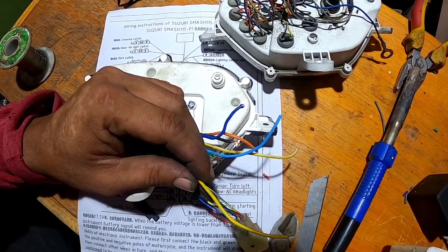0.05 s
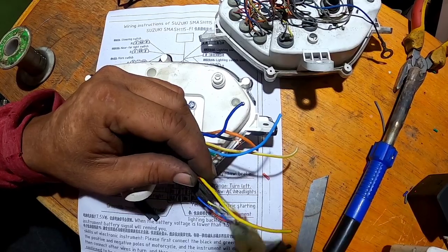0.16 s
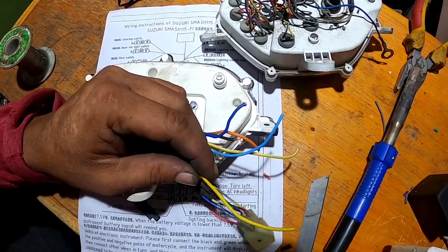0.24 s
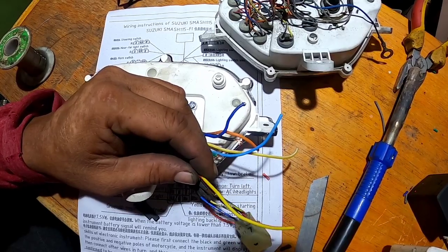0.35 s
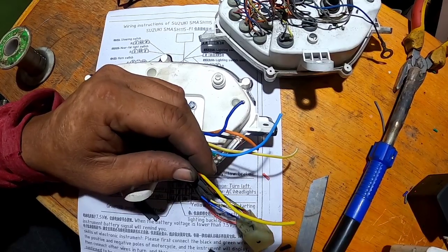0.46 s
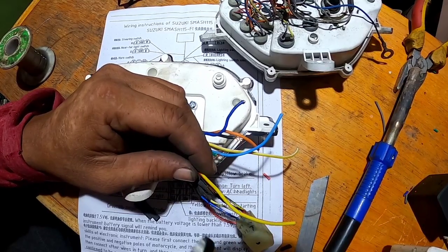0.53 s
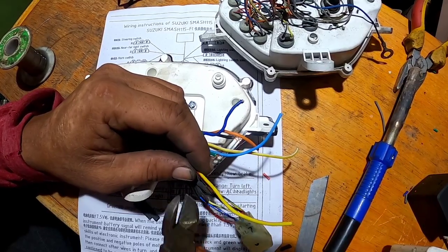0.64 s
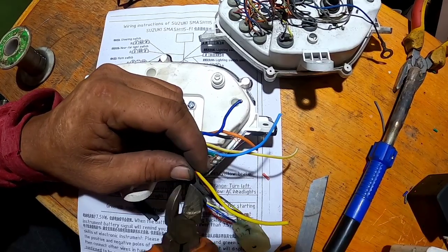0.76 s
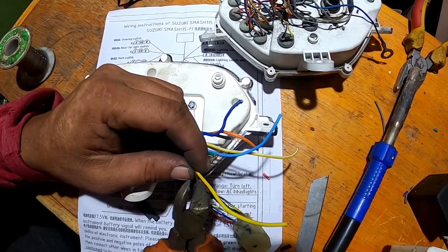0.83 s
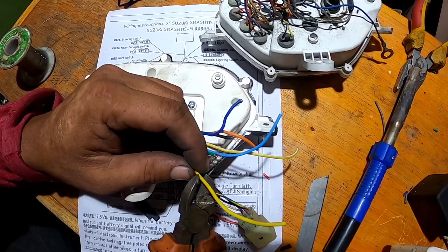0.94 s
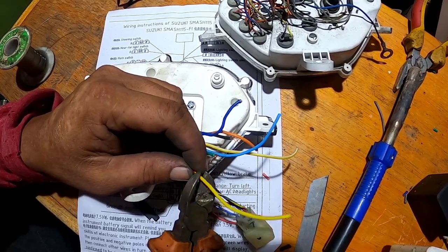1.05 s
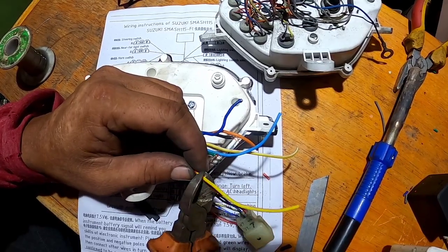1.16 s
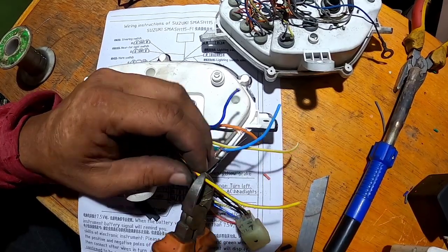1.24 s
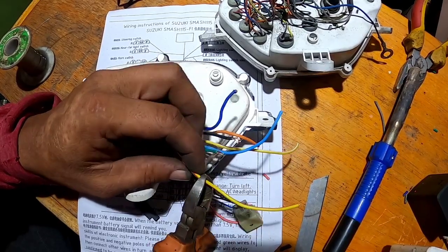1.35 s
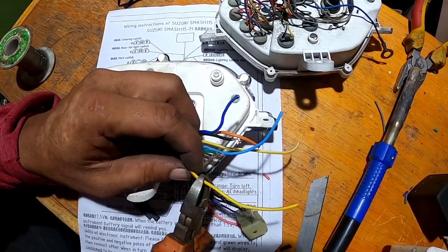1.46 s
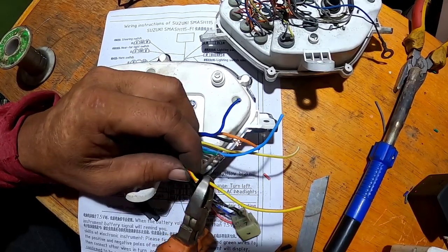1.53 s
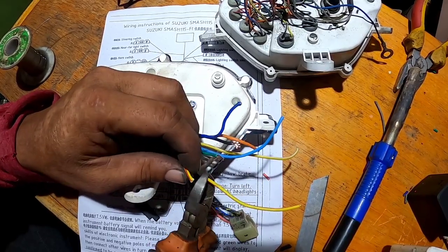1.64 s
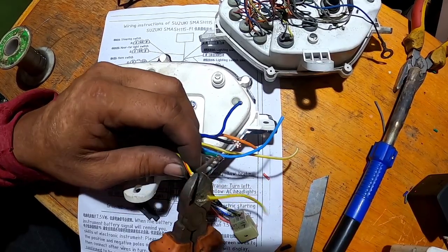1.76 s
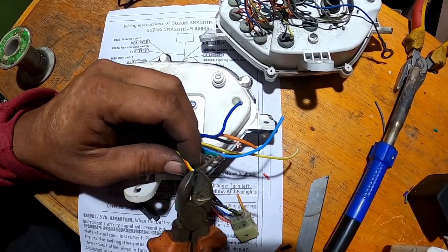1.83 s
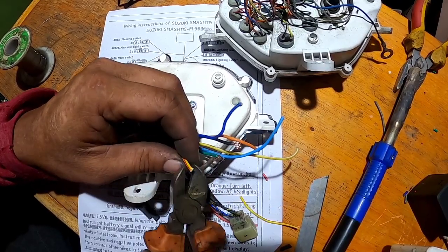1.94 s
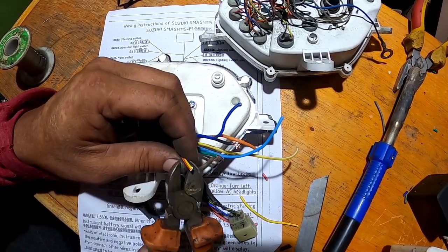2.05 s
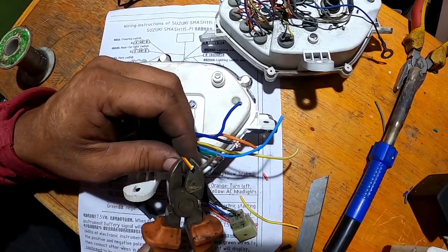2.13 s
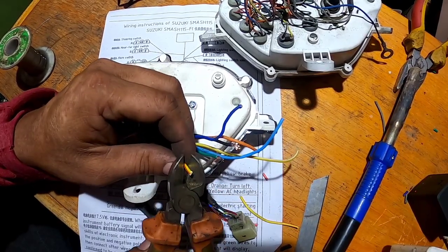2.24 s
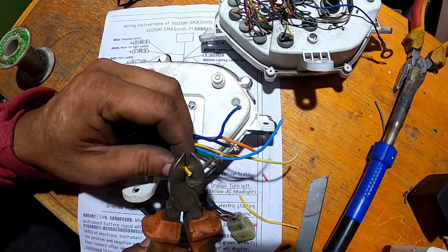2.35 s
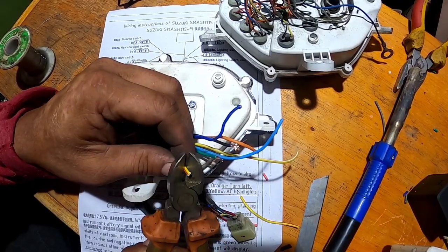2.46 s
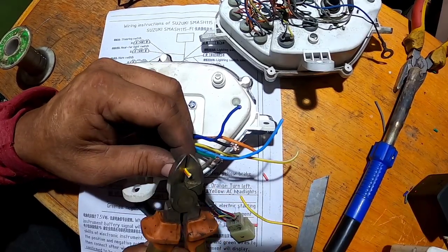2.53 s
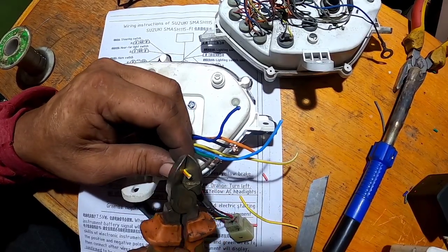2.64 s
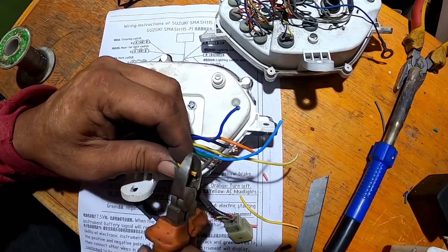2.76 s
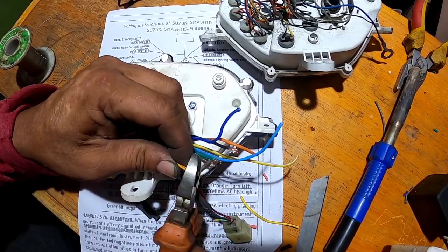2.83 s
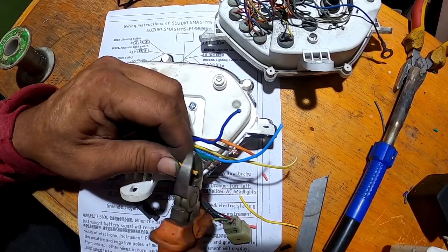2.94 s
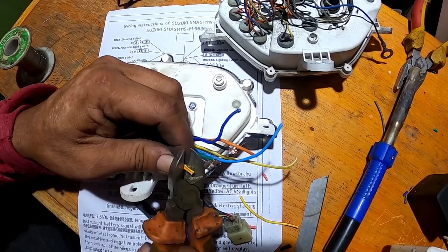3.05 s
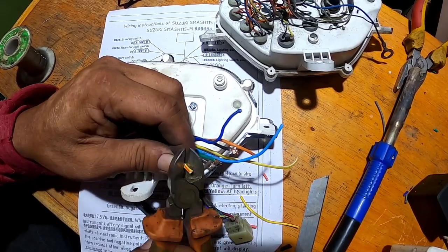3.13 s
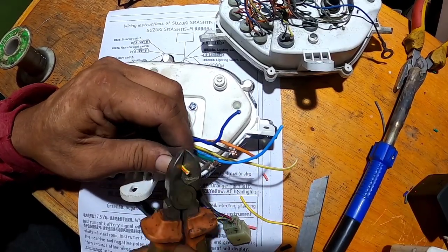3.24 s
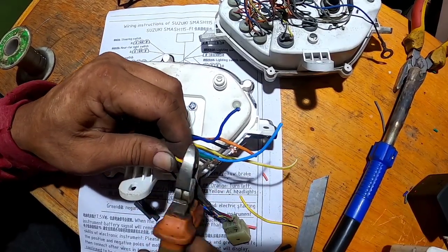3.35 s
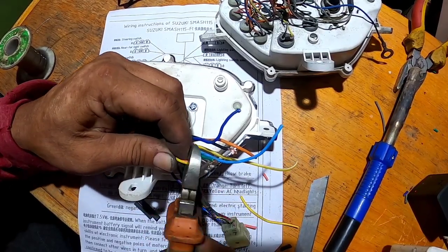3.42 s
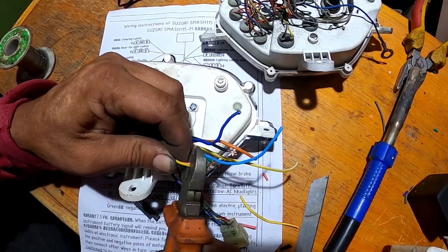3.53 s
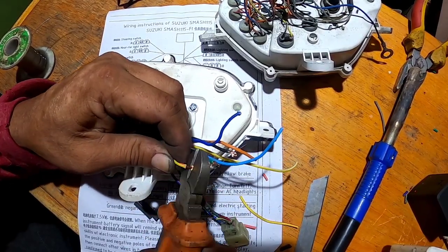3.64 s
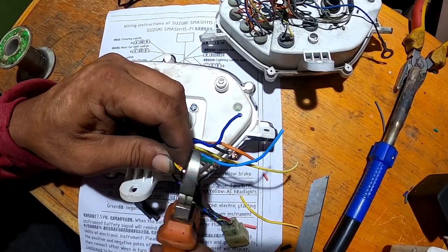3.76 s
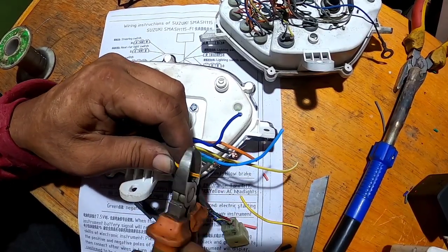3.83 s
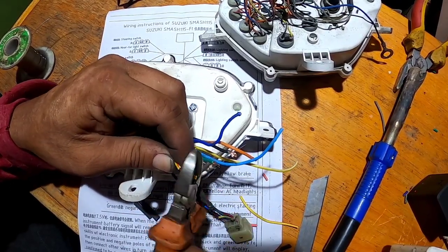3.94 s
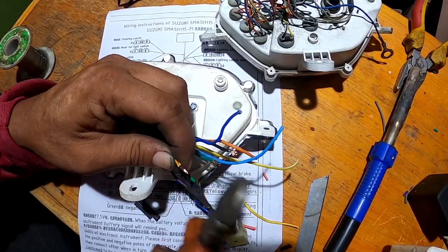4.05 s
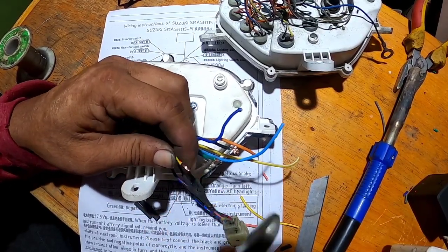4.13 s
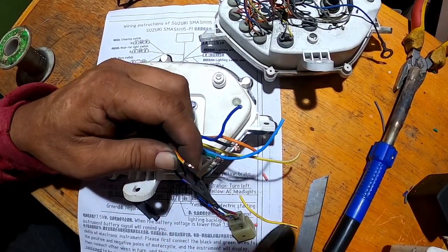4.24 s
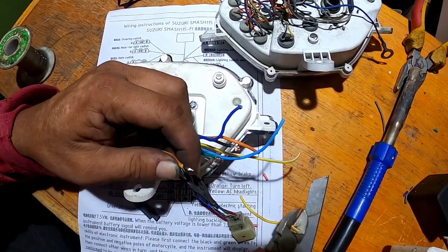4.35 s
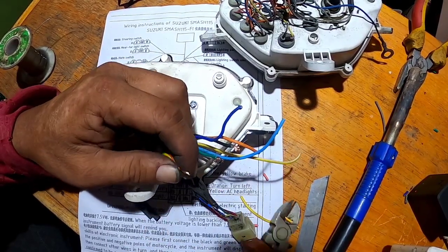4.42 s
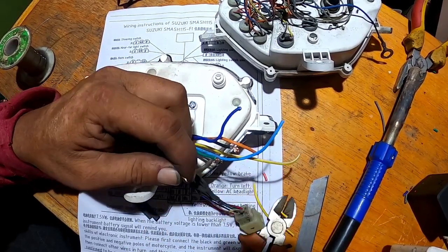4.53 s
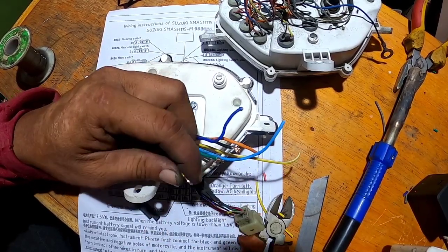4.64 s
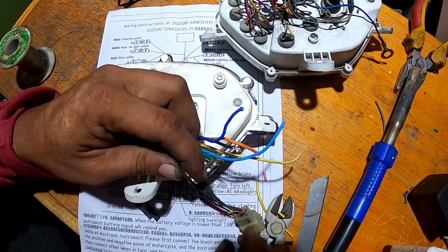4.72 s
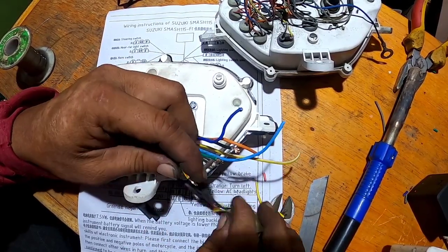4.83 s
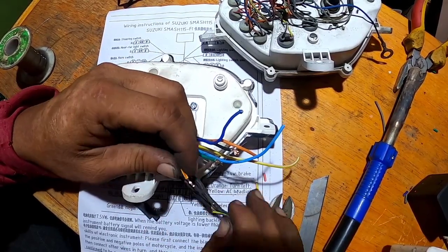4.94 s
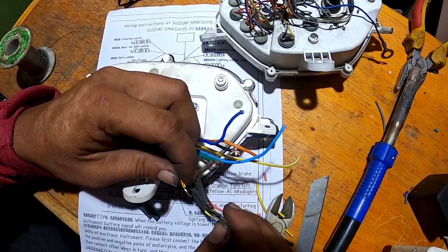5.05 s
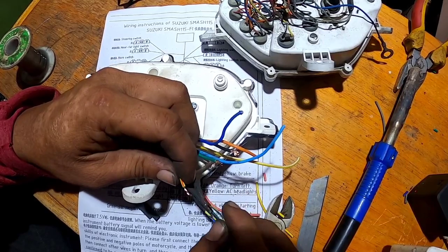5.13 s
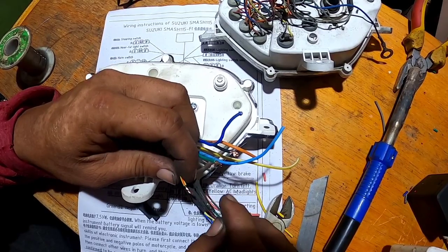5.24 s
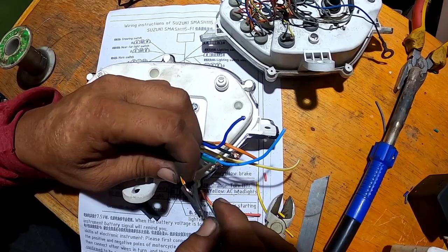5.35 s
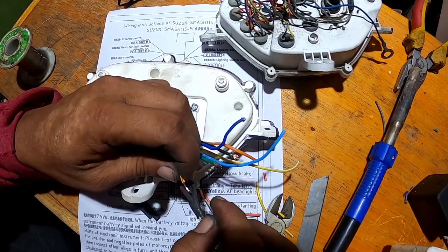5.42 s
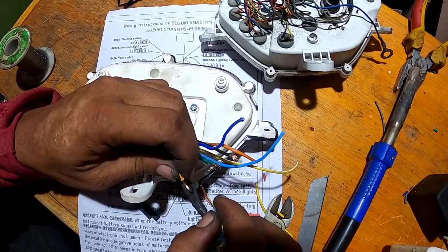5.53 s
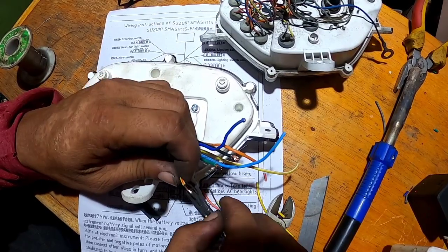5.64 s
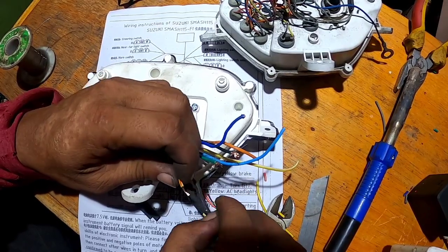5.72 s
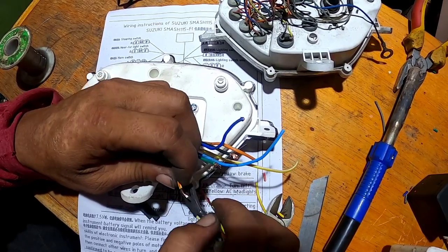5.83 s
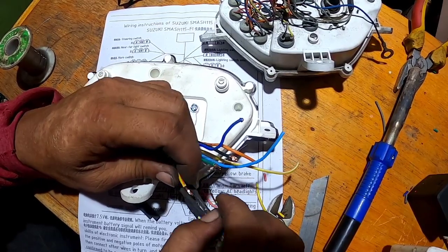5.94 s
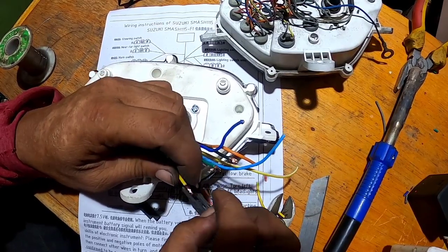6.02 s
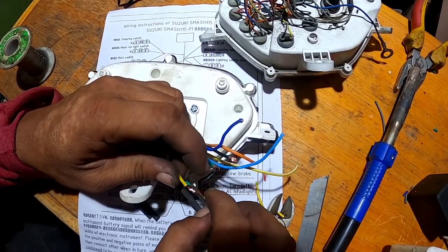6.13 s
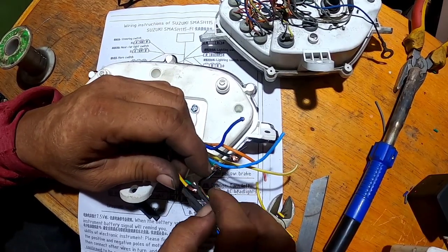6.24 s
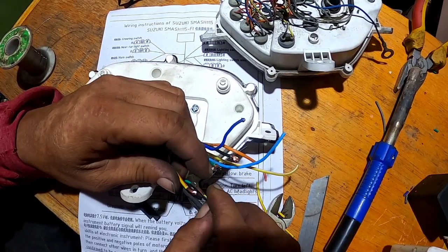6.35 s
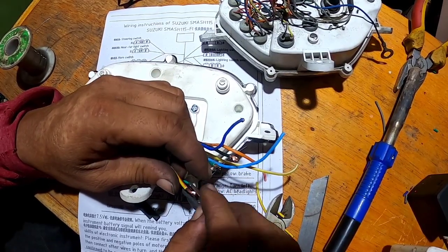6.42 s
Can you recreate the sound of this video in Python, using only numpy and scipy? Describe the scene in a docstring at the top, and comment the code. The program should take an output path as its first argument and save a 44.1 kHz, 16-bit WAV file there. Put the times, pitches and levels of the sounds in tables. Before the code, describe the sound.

Throughout, a low muffled street roar lies behind an idling engine's unsteady hum and a deep throb that comes and goes, strongest around 1.5 s. Close to the small stereo microphone, hands handle thin wires: soft bench bumps and slides at 0.2-0.3 s, dry bright clicks at 0.4 and 0.6, a dull knock at 1.6. Pliers snap sharply at 2.08 s, then more thinly at 2.19, amid tiny ticks. Sparse clicks follow at 2.75 and from 3.6, with light fiddling and a soft thump around 4.1-4.5. At 4.7-4.93 s the pliers drop and bounce, a very loud cluster of cracks, casing rattle and woody boom; the background ducks, then creeps back. A small scrape comes at 5.15, faint ticks at 5.7-6.1. A wall clock rasps faintly late in each second. From 5.2 s a very faint high pulsing trill appears, pauses about 5.4-5.85, and resumes to the end.

```python
"""Street roar, an idling engine and a deep throb come from outside: shaped noise, firing harmonics, a wavering sine.
Close by, hands strip and cut thin wires with pliers over a plastic casing on a wooden bench: noise ticks and scrapes.
The pliers snap twice, then are dropped and bounce: noise cracks that ring damped modes of casing and board.
A wall clock steps once a second in rough ringing contacts; late, a faint trill of short high pulses sets in.
A small stereo camera hears it close up; its gain ducks on peaks, as at the drop, and creeps back."""
import sys
import numpy as np
from scipy import signal
from scipy.fft import rfft, irfft, next_fast_len
from scipy.io import wavfile
from scipy.ndimage import uniform_filter1d, minimum_filter1d, map_coordinates

SR = 44100
rng = np.random.default_rng(int(sys.argv[2]) if len(sys.argv) > 2 else 0)


def voltage_ratio(level):
    """Linear amplitude factor for a level in decibels (scalar or array-like)."""
    return 10 ** (np.asarray(level, float) / 20)


def materialize(psi):
    """Save the field psi as 16-bit PCM at rate SR to the path in sys.argv[1].

    A 1-D psi becomes a single channel; in a 2-D psi each row is a channel.
    """
    bounded = np.clip(np.atleast_2d(psi).T, -1, 1)
    quanta = np.round(bounded * 32767).astype(np.int16)
    wavfile.write(sys.argv[1], SR, quanta)


N = 285768
TIME = np.arange(N) / SR


def unit(x):
    """Scaled to rms 1."""
    return x / np.sqrt(np.mean(x ** 2) + 1e-20)


def along(points, hz):
    """Interpolates (Hz, value) points on a log axis."""
    f, v = np.transpose(points)
    return np.interp(np.log(hz + 1), np.log(f + 1), v)


def curves(rows):
    """One value per sample for each column after the time."""
    s, *cols = np.transpose(rows)
    return [np.interp(TIME, s, c) for c in cols]


def wobble(knots_per_s):
    """A smooth random curve."""
    knots = rng.standard_normal(int(N * knots_per_s / SR) + 4)
    return map_coordinates(knots, [TIME * knots_per_s])


def filtered(x, response):
    """x through a complex response of frequency."""
    m = next_fast_len(2 * x.shape[-1])
    return irfft(rfft(x, m) * response(np.fft.rfftfreq(m, 1 / SR)), m)[..., :x.shape[-1]]


def band(x, centre_hz, octaves):
    """Noise kept around a centre, bell-shaped on a log axis, rms 1."""
    def bell(hz):
        return np.exp(-.5 * (np.log2((hz + 1) / centre_hz) / octaves) ** 2)
    return unit(filtered(x, bell))


def pair(mid, side, width):
    """Left and right from a shared part and a part that differs."""
    return np.array([mid + width * side, mid - width * side])


def add(track, start_s, sound):
    """Mixes a sound into the track in place."""
    part = track[..., round(start_s * SR):][..., :sound.shape[-1]]
    part += sound[..., :part.shape[-1]]


def click(centre_hz, octaves, t60_s, tail_db, tail_t60_s):
    """A burst of coloured noise, gone at once but for a fainter rattle."""
    t = TIME[:SR // 12]
    decay = voltage_ratio(-60 * t / t60_s) + voltage_ratio(tail_db - 60 * t / tail_t60_s)
    fade = decay * (1 - np.exp(-t / 0.00023))
    mid, side = band(rng.standard_normal((2, len(t))), centre_hz, octaves) * fade
    return pair(mid, side, width=0.24)


def ring(modes, weights, attack_s):
    """Damped modes set off together."""
    t = TIME[:SR // 3]
    tones = [w * voltage_ratio(db - 60 * t / t60_s) * np.sin(2 * np.pi * hz * t)
             for w, (hz, db, t60_s) in zip(weights, modes)]
    return sum(tones) * (1 - np.exp(-t / attack_s))


def chatter(sound, t60_s):
    """A rough contact is many tiny pushes in a row, not one."""
    t = TIME[:SR // 25]
    pushes = rng.standard_normal(len(t)) * voltage_ratio(-60 * t / t60_s)
    return signal.fftconvolve(sound, pushes / np.linalg.norm(pushes))


# Spectrum of the traffic. Each row: frequency in Hz, level in dB.
ROAR = [(15, -39), (25, -23.5), (56, -5.5), (85, -6.5), (141, -8.5), (303, -10.5), (391, -20), (840, -28),
        (1000, -23), (1590, -24), (2800, -32), (3300, -39.5), (7200, -42), (7900, -47), (11000, -45.5),
        (14300, -99)]
# Left-right likeness of the traffic. Each row: frequency in Hz, likeness from 0 to 1.
ALIKE = [(60, 0.34), (170, 0.97), (480, 0.83), (1360, 0.73), (3870, 0.64), (11000, 0.04)]
# Stereo lean of the traffic. Each row: frequency in Hz, left over right in dB.
LEAN = [(60, 1), (170, 2.5), (480, -0.5), (1360, 3), (3870, 4.5), (11000, -1.5)]


def roar():
    """Far traffic: shaped noise with slow patches in time and frequency, wider where the ports differ; rms 1."""
    z = signal.stft(rng.standard_normal((2, N)), nperseg=512)[2]
    field = uniform_filter1d(rng.standard_normal(z.shape[1:]), size=6, axis=0)
    field = uniform_filter1d(field, size=14, axis=1)
    patchy = signal.istft(z * voltage_ratio(1.25 * unit(field)), nperseg=512)[1][:, :N]

    def mid_side(hz):
        turn = np.arccos(np.clip(along(ALIKE, hz), 0, 1)) / 2
        return voltage_ratio(along(ROAR, hz)) * [np.cos(turn), np.sin(turn)]
    mid, side = filtered(patchy, mid_side)
    stereo = pair(mid, side, width=1.0)
    return unit(filtered(stereo, lambda hz: voltage_ratio(np.outer([.5, -.5], along(LEAN, hz)))))


# Engine harmonics. Each row: multiple of the firing rate, level in dB, share of the boom's swell.
ORDERS = [(1, -12, 0.82), (2, -6.5, 0.24), (3, -26, 1), (4, -9, 0.9), (5, -1, 0.11), (7, -16.5, 0.12),
          (9, -12, 0.72), (10, -16, 0.92), (13, -36, 0.61)]


def engine(firing_hz, engine_db, boom_db):
    """Harmonics of an unsteady firing rate, each wavering and swelling by its share of the boom."""
    phase = 2 * np.pi * np.cumsum(firing_hz * (1 + 0.0048 * wobble(5.5))) / SR
    out = np.zeros(N)
    for k, db, share in ORDERS:
        level_db = engine_db + db + share * boom_db + 1.1 * wobble(4.5)
        out += np.sqrt(2) * voltage_ratio(level_db) * np.sin(k * phase + rng.uniform(0, 2 * np.pi))
    return out


# Course of the throb. Each row: time in seconds, level in dB.
THROB = [(0, -43.5), (.25, -43), (.7, -50), (.82, -68), (.94, -53), (1.05, -69), (1.15, -41), (1.3, -49.5),
         (1.39, -37.5), (1.57, -32), (1.8, -53), (1.91, -43.5), (2.72, -49.5), (2.8, -64), (2.91, -44),
         (3.1, -70), (3.26, -42), (3.42, -64), (3.68, -41.5), (3.88, -60), (4.2, -45), (4.6, -53),
         (5.4, -54), (6.1, -56), (6.25, -43), (6.48, -56)]


def throb():
    """A deep wavering sine that comes and goes, 2.4 dB stronger on the left."""
    level_db, = curves(THROB)
    hz = 45.3 + 0.815 * wobble(4.02)
    tone = np.sqrt(2) * voltage_ratio(level_db) * np.sin(2 * np.pi * np.cumsum(hz) / SR)
    return tone * voltage_ratio([[1.2], [-1.2]])


# Course of the street. Each row: time in seconds, firing rate in Hz, engine level in dB,
# traffic level in dB, swell of the engine's boom in dB.
STREET = [(0, 29, -49.5, -49, 8), (.6, 28.98, -58.5, -50.5, 15.5), (1.5, 28.84, -52.5, -50, 5.5),
          (2.3, 29.14, -60, -50.5, 16), (3.2, 29.16, -50.5, -51, 2.5), (4.4, 29.2, -50, -50, -0.5),
          (5, 29.25, -47, -44.5, 8), (5.5, 29.17, -53.5, -47.5, 12.5), (5.9, 29.2, -44, -45, 7),
          (6.2, 28.9, -52, -46.5, 18.5), (6.48, 29.44, -59.5, -45, 27)]


def street():
    """Traffic roar, engine and throb outside, each following its own level curve."""
    firing_hz, engine_db, roar_db, boom_db = curves(STREET)
    return voltage_ratio(roar_db) * roar() + engine(firing_hz, engine_db, boom_db) + throb()


# The clearest wire and jaw ticks. Each row: start in seconds, level in dB, centre in Hz.
TICKS = [(0.0261, -35, 4360), (0.032, -42, 4110), (0.0608, -44, 4390), (0.1743, -46, 5340),
         (0.41, -33, 4080), (0.563, -43.5, 5200), (1.6241, -36.5, 7940), (1.6513, -43, 5100),
         (2.049, -44, 4010), (2.104, -35, 4230), (2.117, -33, 6490), (2.1435, -33, 6600),
         (2.2082, -27.5, 5650), (2.232, -45, 4960), (2.3086, -44.5, 5200), (2.358, -52, 5540),
         (2.376, -44, 6300), (2.4608, -42.5, 6100), (2.468, -42, 5210), (2.7506, -30.5, 5170),
         (3.024, -46, 6030), (3.596, -42.5, 4450), (3.907, -39.5, 5590), (4.0066, -39, 4540),
         (4.114, -50, 5770), (4.126, -44, 5950), (4.1904, -46, 4026), (4.3714, -37, 5200),
         (4.502, -42, 3860), (4.724, -29.5, 4100), (5.689, -42, 5890), (5.7199, -44, 6570),
         (5.7284, -40, 4700), (6.05, -45, 3800), (6.091, -47, 3500)]
# Spells of fiddling full of faint ticks. Each row: start in seconds, end in seconds, number of ticks.
FIDDLING = [(1.57, 1.8, 4), (2.1, 2.45, 3), (4.05, 4.5, 7)]


def ticks():
    """Wire ends and jaws touch: dry, very short clicks, the faint ones scattered through the busy spells."""
    out = np.zeros((2, N))
    faint = []
    for start_s, end_s, count in FIDDLING:
        for _ in range(count):
            s = start_s + (end_s - start_s) * rng.random()
            faint.append((s, -51 + 2 * rng.normal(), 5300 * 2 ** (0.21 * rng.normal())))
    for s, db, hz in TICKS + faint:
        pan_db = 2.5 * rng.normal() * np.array([[.5], [-.5]])
        sound = click(hz, 0.77, t60_s=0.0065, tail_db=-13.5, tail_t60_s=0.021)
        add(out, s, voltage_ratio(db - 2.5 + pan_db) * sound)
    return out


# Fingers, wire and steel sliding, plus one short tick at 0.369 s. Each row: start in seconds, length in
# seconds, level in dB, # centre in Hz, width in octaves.
SCRAPES = [(0.18, .03, -64, 4000, 1.65), (0.216, .1, -54, 3940, 0.8), (0.241, 0.081, -52, 1070, 0.85),
           (0.29, 0.026, -60.5, 9700, 0.19), (0.369, 0.013, -62, 2850, 0.24),
           (0.412, 0.024, -60, 4060, 0.4), (0.581, 0.06, -62, 4160, 0.78), (1.631, 0.038, -57.5, 5970, 1.1),
           (1.684, 0.15, -66, 4800, 0.9), (1.963, 0.092, -59.5, 3700, .7), (2.09, 0.2, -56, 5040, 1.6),
           (2.748, 0.094, -73, 6170, 2.5), (4.151, 0.039, -65, 7050, 0.9), (4.259, 0.037, -60, 7000, 0.68),
           (4.315, 0.076, -66, 6000, .7), (4.365, 0.033, -54, 6020, 4.9), (4.417, 0.09, -62, 6300, 0.73),
           (4.653, 0.018, -61, 6500, 0.38), (4.716, 0.13, -42.5, 3040, 1.2), (4.837, 0.13, -42, 3410, 0.88),
           (5.13, .05, -55, 4400, .12), (5.168, .045, -51, 4500, .12), (5.122, 0.1, -57, 4950, 0.91),
           (5.13, 0.047, -59.5, 9000, 0.091)]


def scrapes():
    """Sliding contact: grainy noise swelling and fading under each stroke."""
    out = np.zeros((2, N))
    for s, length_s, db, hz, octaves in SCRAPES:
        n = round(length_s * SR)
        grain = uniform_filter1d(rng.standard_normal(n), size=40) * np.sqrt(40)
        grit = rng.standard_normal((2, n)) * voltage_ratio(4.7 * grain)
        stroke = np.sin(np.pi * (np.arange(n) / n) ** 0.46) ** 0.53
        mid, side = band(grit, hz, octaves) * stroke * voltage_ratio(db + 0.5)
        add(out, s, pair(mid, side, width=0.14))
    return out


# Blows that shake the bench. Each row: start in seconds, crack level in dB, bench level in dB,
# crack centre in Hz, favoured board pitch in Hz.
BLOWS = [(0.183, -34, -55, 1560, 300), (.219, -37, -30, 2500, 316), (0.25, -60, -36.5, 3500, 202),
         (0.2661, -44, -34, 3700, 300), (1.636, -43, -29, 1000, 272), (1.9727, -56, -44, 1510, 255),
         (2.0765, -11.5, -29, 1440, 285), (2.189, -19.5, -45, 3230, 335), (2.2324, -38, -45, 1190, 324),
         (4.283, -70, -38.5, 1500, 72), (4.712, -26.5, -46, 3750, 300), (4.7212, -25, -22.5, 1130, 213),
         (4.7569, -9.5, 0.5, 1880, 266), (4.7745, -30, 2.5, 1830, 240), (4.8298, -13, 1, 3300, 282),
         (4.8516, -2.5, 0, 4070, 140), (4.8695, -38, -5.5, 2470, 300), (4.8983, -10.5, -2, 3480, 329),
         (4.913, -21, -12, 3120, 353), (4.93, -39, -20.5, 2480, 385), (5.162, -30, -35, 1490, 300)]
# Modes of the board. Each row: frequency in Hz, level in dB, t60 in seconds.
BENCH = [(72, 16, 0.047), (133, 4, 0.052), (161, -0.5, 0.11), (182.5, 0, 0.16), (250.7, 2.5, 0.17),
         (272, 2, 0.12), (300, 5, 0.119), (346, -16, 0.2), (385, 4, 0.14), (447, 3.5, .07),
         (550, -3, 0.097)]
# Modes of the casing and the pliers lying on it. Each row: frequency in Hz, level in dB, t60 in seconds.
CASING = [(530, -21.5, 0.37), (646, 4, 0.077), (700, -1.5, 0.069), (767, 2, .03), (846, 2.5, 0.023),
          (1008, 5, 0.039), (1153, 6, 0.035), (1244, 8.5, 0.02), (1437, 2.5, .025), (1598, -4, 0.064),
          (1860, -13, 0.058), (2043, -8, 0.053), (2130, -15, 0.09), (2570, -43, 0.039),
          (3085, -11.5, 0.016), (3160, -38, 0.02), (3500, -26, 0.075), (3990, -11, 0.022),
          (4430, -7, 0.016)]


def blows():
    """Each blow cracks, rings the casing (harder = brighter) and booms in board modes near its favoured pitch."""
    out = np.zeros((2, N))
    casing_hz, bench_hz = np.transpose(CASING)[0], np.transpose(BENCH)[0]
    for s, crack_db, bench_db, crack_hz, boom_hz in BLOWS:
        crack = click(crack_hz, .34, t60_s=.009, tail_db=-17, tail_t60_s=.06)
        add(out, s, voltage_ratio(crack_db - 0.5) * crack)
        steel_edge = click(1.75 * crack_hz, 1.2, t60_s=0.016, tail_db=-9.5, tail_t60_s=.03)
        add(out, s, voltage_ratio(crack_db - 13.5) * steel_edge)

        # the casing is rung by the contact or by the shaking board; a deep soft push barely stirs it
        deep_db = 12 * min(np.log2(boom_hz / 240), 0)
        casing_db = max(crack_db - 13, bench_db - 11 + deep_db)
        # a soft contact cannot reach the high modes
        octaves_up = np.log2(casing_hz / crack_hz)
        tilt_db = 1.9 * np.minimum(octaves_up, 0) - 9 * np.maximum(octaves_up, 0)
        scatter_db = rng.normal(0, 3, len(CASING))
        add(out, s, voltage_ratio(casing_db) * ring(CASING, voltage_ratio(tilt_db + scatter_db), attack_s=1.8 / crack_hz))
        # loose parts rattle between the modes
        rattle = click(np.sqrt(450 * crack_hz), 0.94, t60_s=0.033, tail_db=-10, tail_t60_s=0.09)
        add(out, s + 0.00046, voltage_ratio(casing_db - 1) * rattle)

        favour = voltage_ratio(-22 * np.abs(np.log2(bench_hz / boom_hz)))
        add(out, s + 0.0022, voltage_ratio(bench_db) * ring(BENCH, favour, attack_s=0.0026))
    return out


# Contacts of the gear train within each second. Each row: time in seconds, level in dB.
CLOCK_STEP = [(0.729, -47.5), (0.748, -39.5), (0.759, -49), (0.778, -44), (0.802, -46), (.822, -56)]
# Modes of the clock case. Each row: frequency in Hz, level in dB, t60 in seconds.
CLOCK_CASE = [(1640, 0, .012), (1880, -2, .01), (3400, -8, .006)]


def clock():
    """Once a second the gears step through a few small rough contacts that rasp and ring the clock case."""
    out = np.zeros(N)
    for second in range(6):
        for s, db in CLOCK_STEP:
            knock = ring(CLOCK_CASE, rng.normal(1, .3, len(CLOCK_CASE)), attack_s=0.0003)
            rasp = click(3440, 0.77, t60_s=0.027, tail_db=-38, tail_t60_s=.08)[0]
            add(knock, 0, voltage_ratio(-8.0) * rasp)
            add(out, second + s + rng.normal(0, 0.0012), voltage_ratio(db) * chatter(knock, t60_s=0.12))
    return out


def trill():
    """A faint high trill, perhaps a cricket: short uneven pulses on one wavering pitch, with one pause."""
    start_s, pulses_per_s, pitch_hz = 5.196, 25.9, 4720
    pause_from_s, pause_to_s = 5.43, 5.85
    stroke = (TIME - start_s) * pulses_per_s
    sounding = (stroke > 0) * ((TIME < pause_from_s) | (TIME > pause_to_s))
    pulses = np.exp(-.5 * ((stroke % 1 - .5) / .065) ** 2) * sounding
    tone = np.sin(2 * np.pi * np.cumsum(pitch_hz + 110 * wobble(250)) / SR)
    return voltage_ratio(-67.5 + 4 * wobble(12)) * pulses * tone


# Decay of the room. Each row: frequency in Hz, t60 in seconds.
ROOM = [(150, 0.14), (1000, 0.17), (4000, 0.08), (10000, 0.045)]


def room(x):
    """A noise tail in which each frequency dies at its own speed, 150 samples after the direct sound."""
    hz, t, z = signal.stft(rng.standard_normal((2, SR // 2)), SR, nperseg=256)
    tail = signal.istft(z * voltage_ratio(-60 * t / along(ROOM, hz)[:, None]), SR, nperseg=256)[1]
    # the board's boom reaches both ports alike, so it is kept out of the tail
    x = filtered(x, lambda f: (1j * f / (450 + 1j * f)) ** 2)
    return signal.fftconvolve(np.pad(x, (150, 0))[None], tail / np.linalg.norm(tail[0]), axes=1)[:, :N]


# Colour of everything close under the camera. Each row: frequency in Hz, level in dB.
CLOSE = [(40, -11), (110, -0.5), (2500, -3), (3300, 2), (4300, 0), (5500, 0.5), (7400, -2.5), (9500, 1.5),
         (12000, -1.5)]
# Stereo lean of the same. Each row: frequency in Hz, left over right in dB.
CLOSE_LEAN = [(200, -1.7), (2500, 3), (5000, 0.5), (9000, -5.5)]


def scene():
    """Hands close under the camera, the clock across the room, the street outside."""
    def colour(hz):
        return voltage_ratio(along(CLOSE, hz) + np.outer([.5, -.5], along(CLOSE_LEAN, hz)))
    outside = street()
    near = filtered(ticks() + scrapes() + blows(), colour)
    wall = clock()
    wet = room(voltage_ratio(-13.5) * near.mean(axis=0) + voltage_ratio(-6) * wall)
    return outside + near + wall * voltage_ratio([[2.5], [-2.5]]) + wet + trill()


def low_pass(x):
    """Removes everything above the highest recorded frequency."""
    return signal.sosfilt(signal.butter(12, 11550, fs=SR, output="sos"), x)


# Response of the microphones. Each row: frequency in Hz, level in dB.
MIC = [(20, 3.5), (6000, 0), (9500, -3.5), (11000, -8.5), (12000, -27), (16000, -60)]


def record(dry):
    """The left port hears 35 us late; gain control ducks on peaks, holds, then creeps back; loud peaks round off."""
    def ports(hz):
        lag = np.exp(-2j * np.pi * hz * np.array([[.000035], [0]]))
        return voltage_ratio(along(MIC, hz)) * lag
    x = filtered(dry, ports)
    over_db = 20 * np.log10(np.abs(x).max(axis=0) + 1e-9) + 12  # above a -12 dB threshold
    hold = round(.3 * SR)
    need_db = minimum_filter1d(-.6 * np.maximum(over_db, 0), hold, origin=(hold - 1) // 2)
    creep_db = 11 * TIME  # recovery of 11 dB a second
    gain_db = creep_db + np.minimum.accumulate(need_db - creep_db)
    x = x * voltage_ratio(uniform_filter1d(gain_db, size=400))
    limited = x / (1 + np.abs(x / 1.7) ** 6) ** (1 / 6)
    return low_pass(limited)


dry = scene()
out = record(dry)
materialize(out)
```